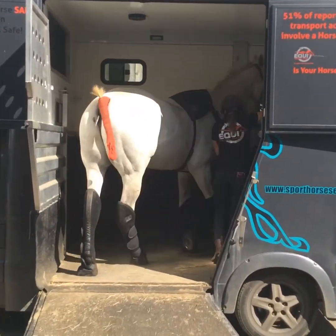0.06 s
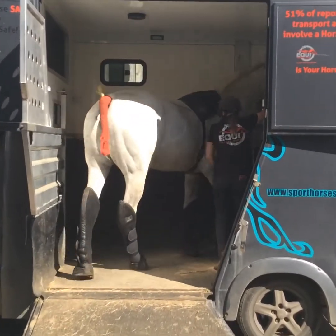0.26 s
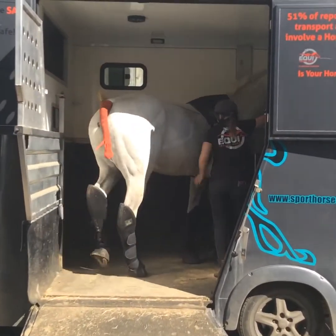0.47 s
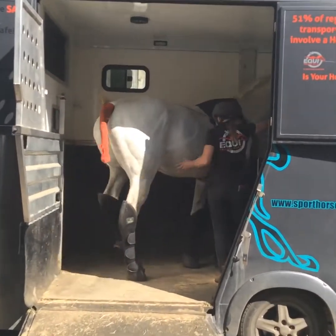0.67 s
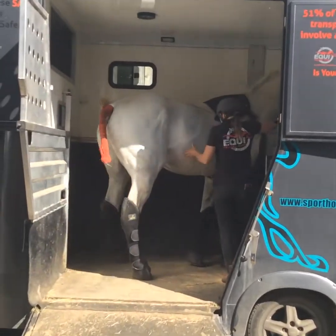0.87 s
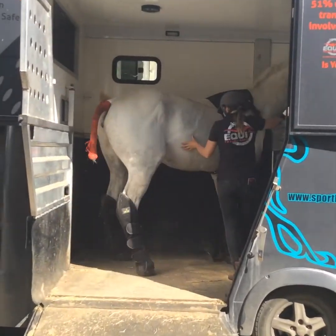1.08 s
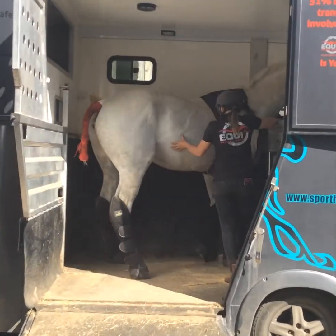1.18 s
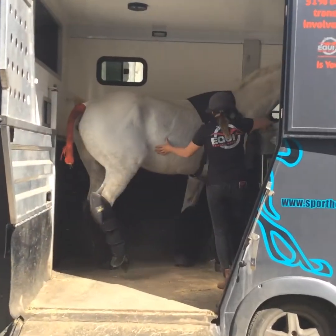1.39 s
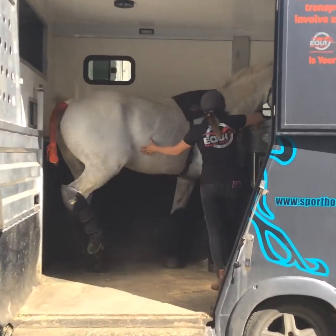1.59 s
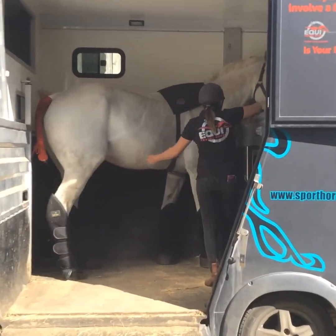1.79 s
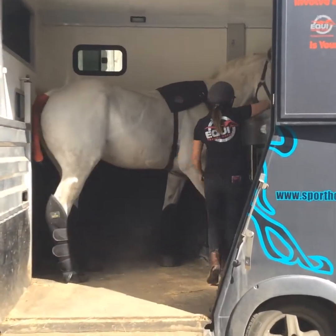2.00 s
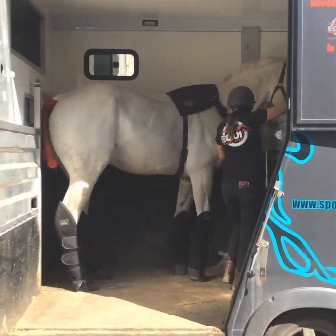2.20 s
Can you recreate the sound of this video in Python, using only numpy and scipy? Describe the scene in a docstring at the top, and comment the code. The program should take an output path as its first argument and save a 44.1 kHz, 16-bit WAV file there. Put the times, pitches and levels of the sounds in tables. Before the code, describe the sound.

Hooves thud and scuff on a horsebox's matted floor, heard from just outside. After the first step, a loud kick cracks against the wall panel; a softer step and another thud follow over a faint low rumble.

```python
"""A horse shifts about in a horse lorry, heard from the foot of the open ramp.
Over quiet outdoor air and the rumble of the rocking body, hooves scuff, fittings squeak and grit ticks.
A hoof thuds on the matted hollow floor, then a hind hoof kicks the wall panel and the box rings on.
A second, softer step follows; the shuffling goes on, tack snaps once and a third step lands."""
import sys
import numpy as np
from scipy import signal
from scipy.fft import rfft, irfft
from scipy.io import wavfile
from scipy.ndimage import uniform_filter1d

SR = 44100
rng = np.random.default_rng(int(sys.argv[2]) if len(sys.argv) > 2 else 0)


def inscribe(sig):
    """Save sig as 16-bit PCM at rate SR to the path in sys.argv[1].

    A 1-D sig is mono; a 2-D sig holds one channel per row.
    Samples are clipped to [-1, 1] before scaling.
    """
    pcm = np.round(np.clip(np.atleast_2d(sig).T, -1, 1) * 32767)
    wavfile.write(sys.argv[1], SR, pcm.astype(np.int16))


N = 99225
T = np.arange(N) / SR


def amp(db):
    """Decibels to gain."""
    return 10 ** (np.asarray(db) / 20)


def unit(x):
    """Scales to rms 1."""
    return x / np.sqrt(np.mean(x ** 2) + 1e-20)


def read(points, hz):
    """Reads a curve on a log-frequency axis."""
    freqs, values = np.transpose(points)
    return np.interp(np.log(hz + 1), np.log(freqs + 1), values)


def colour(x, spectrum):
    """Shapes a signal with an EQ curve, at rms 1."""
    return unit(irfft(rfft(x) * amp(read(spectrum, np.fft.rfftfreq(N, 1 / SR))), N))


def noise(spectrum):
    """Coloured noise at rms 1."""
    return colour(rng.standard_normal(N), spectrum)


def band(hz, width_hz):
    """Noise in a steep resonance whose centre may glide."""
    white = rng.standard_normal(N) + 1j * rng.standard_normal(N)
    skirts = 1 + (2 * np.fft.fftfreq(N, 1 / SR) / width_hz) ** 2
    wobble = np.fft.ifft(np.fft.fft(white) / skirts)
    carrier = np.exp(2j * np.pi * np.cumsum(hz * np.ones(N)) / SR)
    return unit((wobble * carrier).real)


def pulse(spectrum):
    """One minimum-phase click with the given spectrum, at peak 1."""
    log_gain = np.log(amp(read(spectrum, abs(np.fft.fftfreq(4096, 1 / SR)))))
    click = np.fft.ifft(np.exp(np.conj(signal.hilbert(log_gain)))).real[:2048]
    return click / abs(click).max()


def fade(t60, t=T):
    """Exponential decay, 60 dB down after t60 seconds."""
    return np.exp(-np.log(1000) * t / t60)


def rise(seconds):
    """Smooth attack from 0 to 1."""
    return np.sin(np.pi / 2 * np.minimum(T / seconds, 1)) ** 2


def stroke(length, peak):
    """A swell and release; peak is the share of the length spent swelling."""
    return np.sqrt(np.interp(T, [0, length * np.clip(peak, .02, .9), length], [0, 1, 0]))


def add(mix, start_s, sound):
    """Mixes a sound in, trimming what falls outside the scene."""
    at = round(start_s * SR)
    sound = sound[max(-at, 0):]
    part = mix[max(at, 0):][:len(sound)]
    part += sound[:len(part)]


def ring(modes):
    """Decaying modes of a struck object."""
    return sum(amp(db) * fade(t60) * np.sin(2 * np.pi * hz * T) for hz, db, t60 in modes)


def die_in_box(x):
    """The horse box's decay: the treble dies sooner than the bass."""
    # Decay time of the box: freq_hz, t60_s
    box_decay = [(100, 0.54), (260, 0.51), (700, 0.43), (1840, 0.38), (4850, 0.29), (12800, 0.27)]
    hz, t, bands = signal.stft(x, SR, nperseg=512)
    return signal.istft(bands * fade(read(box_decay, hz)[:, None], t), SR, nperseg=512)[1][:N]


def outdoor_air():
    """A faint bed of air whose level flickers in small patches of time and frequency."""
    # Colour of the air: freq_hz, gain_db
    air_eq = [(20, -24), (50, -9.5), (130, -1), (300, -4), (600, -8.5), (1200, -11), (2500, -16),
              (6300, -16), (7500, -24.5), (9500, -20), (13500, -31), (16000, -48)]
    flicker_db, patch_s, patch_hz = 2, 0.077, 856
    bands = signal.stft(noise(air_eq), SR, nperseg=512)[2]
    patches = rng.standard_normal(bands.shape)
    for axis, size in enumerate([patch_hz * 512 / SR, patch_s * SR / 256]):
        patches = uniform_filter1d(patches, round(size), axis=axis)
    return amp(-61.5) * signal.istft(bands * amp(flicker_db * unit(patches)), SR, nperseg=512)[1][:N]


def body_rumble():
    """The lorry's body rocks on its springs with a low, swelling rumble."""
    # Swells of the rocking: time_s, level_db
    rocking = [(0, -52.5), (.15, -72), (.4, -45.5), (.75, -57.5), (1.2, -57), (1.5, -54), (1.75, -81),
               (1.86, -56.5), (2.03, -42.5), (2.25, -54)]
    # Colour of the rumble: freq_hz, gain_db
    rumble_eq = [(20, -27), (55, 5.5), (100, -3.5), (220, -2), (330, -7), (450, -18.5), (700, -19),
                 (3000, -46)]
    return amp(np.interp(T, *np.transpose(rocking))) * noise(rumble_eq)


def hoof_scuffs():
    """A hoof sliding over the mat makes a dull rub with a hiss of rolling grains."""
    # Hoof slides: start_s, length_s, swell_share (0-1), rub_db, hiss_db
    slides = [(-.05, 0.22, 0.56, -56, -59), (.097, 0.22, 0.1, -51, -56.5), (0.242, 0.13, 0.06, -50, -56.5),
              (0.689, 0.26, 0.6, -61, -89), (0.843, 0.096, 0.18, -52, -62.5), (0.932, .16, 0.51, -55, -62),
              (1.085, .14, 0.26, -52, -61), (1.202, 0.13, 0.4, -50, -65), (1.318, 0.14, 0.67, -57, -89),
              (1.552, 0.038, 0.2, -57.5, -67), (1.599, 0.091, 0.06, -56.5, -67),
              (1.743, 0.029, 0.2, -68, -61), (1.862, 0.13, 0.1, -49, -54.5),
              (2.025, 0.058, .25, -59, -62.5), (2.149, 0.14, 0.12, -56.5, -72.5)]
    # Colour of the dull rub: freq_hz, gain_db
    rub_eq = [(60, 10), (250, 10.5), (900, 7.5), (1500, 3), (2600, -8), (5000, -69), (15000, -104)]
    # Colour of the gritty hiss: freq_hz, gain_db
    hiss_eq = [(500, -60), (2000, -3), (4000, 6.5), (6300, 7.5), (7500, 0), (10000, 0), (13000, 0.5),
               (16000, -25)]
    grain_spread_db, grains_per_s, grain_share = 3, 1500, 0.43
    out = np.zeros(N)
    for start_s, length_s, swell, rub_db, hiss_db in slides:
        sizes = amp(grain_spread_db * np.minimum(rng.exponential(1, N), 4))
        grains = sizes * rng.standard_normal(N) * (rng.random(N) < grains_per_s / SR)
        friction = np.sqrt(grain_share) * unit(grains) + np.sqrt(1 - grain_share) * rng.standard_normal(N)
        scuff = amp(rub_db) * colour(friction, rub_eq) + amp(hiss_db) * colour(friction, hiss_eq)
        add(out, start_s, stroke(length_s, swell) * scuff)
    return out


def fitting_squeaks():
    """Fittings rub and sound one narrow resonance each."""
    # Squeaks: start_s, length_s, pitch_hz, glide_hz_per_s, width_hz, level_db
    squeaks = [(0.095, 0.035, 14200, 0, 404, -64), (0.096, 0.02, 9740, 0, 207, -59),
               (0.296, 0.13, 10130, -1200, 266, -57), (0.301, 0.088, 13700, 0, 300, -68),
               (1.085, 0.021, 5630, 0, 1000, -51), (1.084, 0.072, 3920, 0, 900, -57),
               (1.746, 0.07, 1112, -900, 80, -56.5), (2.035, 0.1, 851, 0, 40, -56),
               (2.16, 0.094, 1202, 0, 41.5, -62)]
    out = np.zeros(N)
    for start_s, length_s, pitch_hz, glide, width_hz, level_db in squeaks:
        envelope = amp(level_db) * stroke(length_s, peak=0.033) ** 2
        add(out, start_s, envelope * band(pitch_hz + glide * T, width_hz))
    return out


def grit_ticks():
    """Grit and tack give short bright ticks that ring on in the box."""
    # Ticks: start_s, level_db, t60_s
    ticks = [(0.1352, -40, 0.021), (.137, -67, 0.012), (.149, -46, .008), (.158, -59, .008),
             (.173, -39.5, 0.011), (0.1858, -40.5, 0.014), (.193, -43.5, 0.074), (0.2576, -40.5, 0.011),
             (.849, -58, 0.0051), (.937, -52.5, 0.053), (.961, -42.5, 0.016), (1.035, -46, 0.022),
             (1.168, -48, 0.045), (1.26, -49.5, 0.02), (1.422, -48.5, 0.0087), (1.531, -44, 0.0032),
             (1.6889, -46, 0.029), (1.8352, -41.5, 0.0062), (1.8643, -41, 0.019), (1.8952, -42.5, 0.042),
             (1.922, -42, 0.006), (2.04, -51, 0.031), (2.131, -46.5, 0.0079), (2.203, -44.5, 0.0027)]
    # Colour of a tick: freq_hz, gain_db
    tick_eq = [(300, -20), (1500, 7), (4000, 8), (6500, 5.5), (10000, 3.5), (15000, -3)]
    direct = np.zeros(N)
    for start_s, level_db, t60_s in ticks:
        add(direct, start_s, amp(level_db) * fade(t60_s) * noise(tick_eq))
    room = die_in_box(rng.standard_normal(N))
    reverb = signal.fftconvolve(direct, room / np.linalg.norm(room))[:N]
    return direct + amp(-2.5) * reverb


def hoof_steps():
    """The hoof knocks the boards through the mat; then the weight comes down and the floor bounces."""
    # Hoof falls: start_s, boards_db, thump_db, knock_db, knock_hz, knock_width_hz,
    # weight_delay_s, weight_db, bounce_db, bounce_hz, bounce_t60_s
    falls = [(0.2071, -16.5, -28.5, -33.5, 897, 910, .035, -22.5, -18, 60.8, 0.29),
             (0.9807, -25, -37, -40.5, 592.7, 346, 0.027, -28, -41, 51, 0.41),
             (1.8801, -22.5, -43, -34, 664.5, 435, .019, -43, -15, 53.5, 0.16)]
    # Modes of the floor boards: pitch_hz, level_db, t60_s
    board_modes = [(118.05, -2.5, 0.38), (141.3, -1, 0.22), (179.5, -8, 0.37), (216.7, -15.5, 0.39)]
    # Colour of the soft thump through the rubber mat: freq_hz, gain_db
    thump_eq = [(40, 2), (130, 0.5), (220, 4.5), (330, 1), (450, -21)]
    bounce_rise_s = 0.0329
    mat_lowpass = signal.butter(4, 500, fs=SR, output="sos")  # the rubber swallows the treble
    boards = rise(seconds=0.0077) * ring(board_modes)
    out = np.zeros(N)
    for (start_s, boards_db, thump_db, knock_db, knock_hz, knock_width_hz,
         weight_delay_s, weight_db, bounce_db, bounce_hz, bounce_t60_s) in falls:
        thump = amp(thump_db) * fade(t60=0.42) * signal.sosfilt(mat_lowpass, noise(thump_eq))
        knock = amp(knock_db) * fade(t60=0.23) * band(knock_hz, knock_width_hz)
        add(out, start_s, rise(seconds=0.0033) * (thump + knock) - amp(boards_db) * boards)
        weight_s = start_s + weight_delay_s
        add(out, weight_s, amp(weight_db) * boards)
        envelope = rise(bounce_rise_s) * np.minimum(fade(bounce_t60_s, T - bounce_rise_s), 1)
        bounce = envelope * np.sin(2 * np.pi * bounce_hz * T)
        add(out, weight_s - bounce_rise_s / 2, -amp(bounce_db) * bounce)
    return out


def wall_kick():
    """A hoof cracks against the wall in quick contacts; the panel and the box ring."""
    # The hoof lands edge first, then flat: start_s, level_db, t60_s
    contacts = [(0.4671, -13.5, 0.034), (0.4725, -21, 0.021), (0.4794, -18.5, 0.043)]
    # Colour of each contact: freq_hz, gain_db
    crack_eq = [(50, -40), (430, -17), (700, -0.5), (900, 8.5), (1200, -21.5), (1800, -3), (2300, -6),
                (3200, -8), (6400, -10.5), (7500, -18.5), (10000, -23), (15000, -43)]
    # Modes of the wall panel: pitch_hz, level_db, t60_s
    panel_modes = [(130, -3, .13), (177.1, -5.5, 0.37), (232, -21, 0.22), (329, 7, 0.058),
                   (485.3, 10.5, 0.069), (573.5, -10, 0.17), (693, 5.5, 0.17), (835, -1.5, 0.3),
                   (941.5, -2.5, 0.17), (1003, -10, 0.31), (1571, -8.5, 0.24), (1820, -25, 0.54),
                   (1940, -0.5, 0.1), (3094, -3, 0.088), (3246, -2, 0.11)]
    # Colour of the ringing box: freq_hz, gain_db
    box_eq = [(50, -22), (130, -6), (200, 0.5), (280, -5.5), (390, -10), (490, -1.5), (850, -3.5),
              (1200, -13), (1800, -8.5), (2300, -17.5), (3200, -10), (4500, -16.5), (6400, -18.5),
              (7500, -25.5), (10000, -28.5), (15000, -51)]
    out = np.zeros(N)
    for start_s, level_db, t60_s in contacts:
        add(out, start_s, amp(level_db) * rise(seconds=0.00021) * fade(t60_s) * noise(crack_eq))
    hit_s, hit_db, _ = contacts[0]
    add(out, hit_s, amp(hit_db + 6.5) * pulse(crack_eq))  # a hard click tops the first contact
    panel = amp(-21) * rise(seconds=0.0011) * ring(panel_modes)
    box = amp(-18.5) * rise(seconds=0.0071) * die_in_box(noise(box_eq))
    add(out, hit_s, panel + box)
    return out


def tack_snap():
    """The tack snaps once with a sharp, dry click."""
    # Colour of the snap: freq_hz, gain_db
    snap_eq = [(500, -35), (2200, -17), (3800, 4), (6000, -4), (8500, 1.5), (10000, -16), (16000, -14.5)]
    out = np.zeros(N)
    add(out, start_s=1.688, sound=amp(-28) * pulse(snap_eq))
    return out


def scene():
    """The blows, the small movements and the bed, mixed in mono."""
    blows = hoof_steps() + wall_kick()
    movements = hoof_scuffs() + grit_ticks() + tack_snap() + fitting_squeaks()
    bed = outdoor_air() + body_rumble()
    return (blows + movements + bed)[None]


def record(dry):
    """The microphone's low cut and the recorder's band limit."""
    low_cut_hz, top_hz = 30, 16100
    low_cut = signal.butter(3, low_cut_hz, "high", fs=SR, output="sos")
    band_limit = signal.firwin(511, top_hz, window=("kaiser", 9), fs=SR)
    return signal.oaconvolve(signal.sosfilt(low_cut, dry), band_limit[None], "same")


dry = scene()
out = record(dry)
inscribe(out)
```